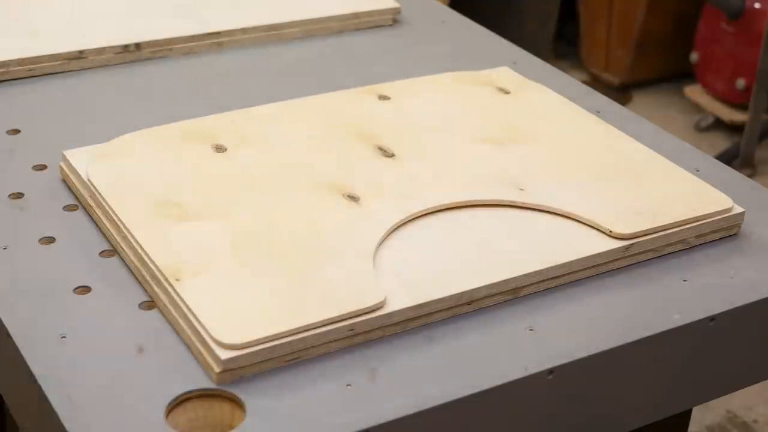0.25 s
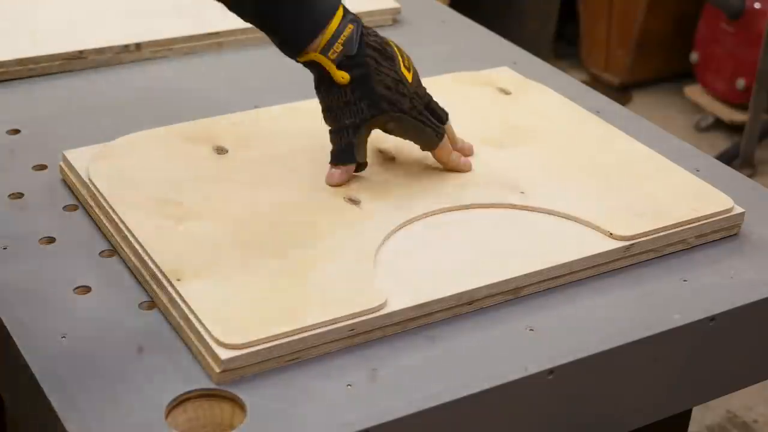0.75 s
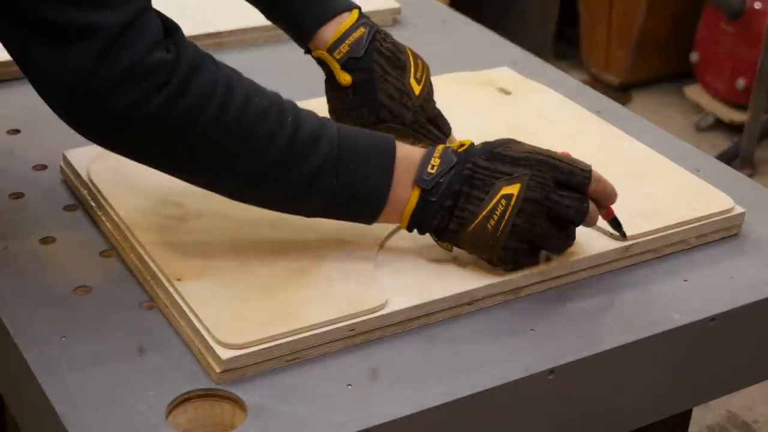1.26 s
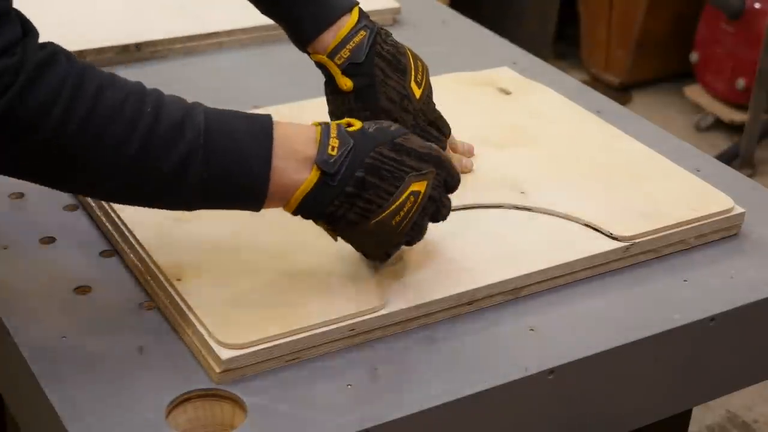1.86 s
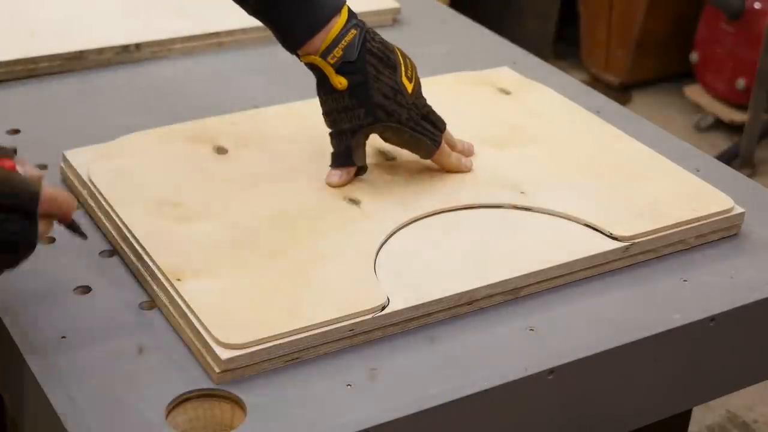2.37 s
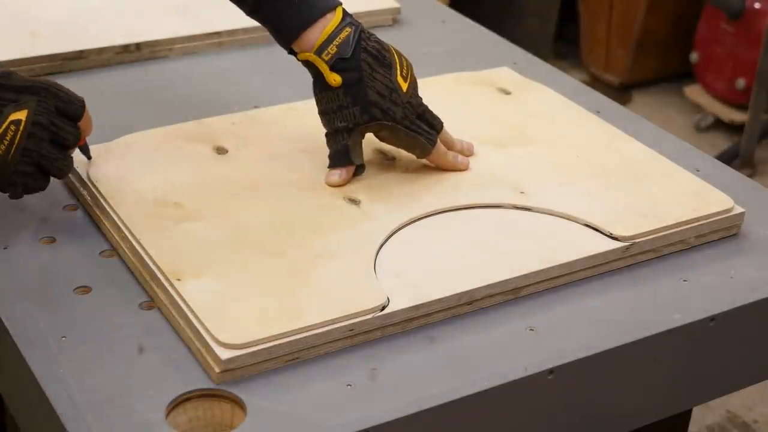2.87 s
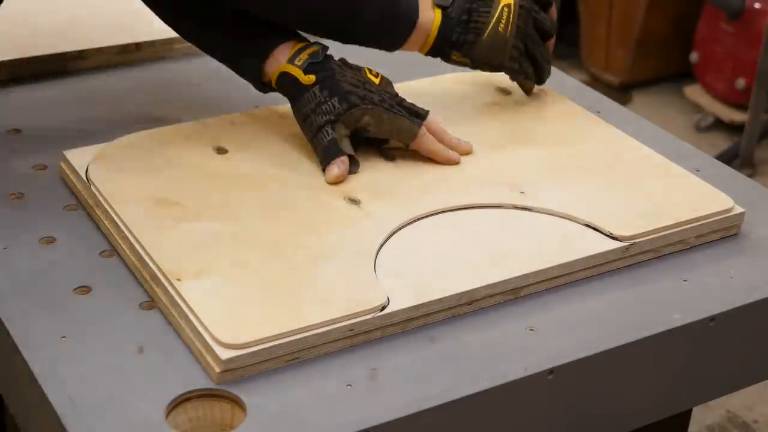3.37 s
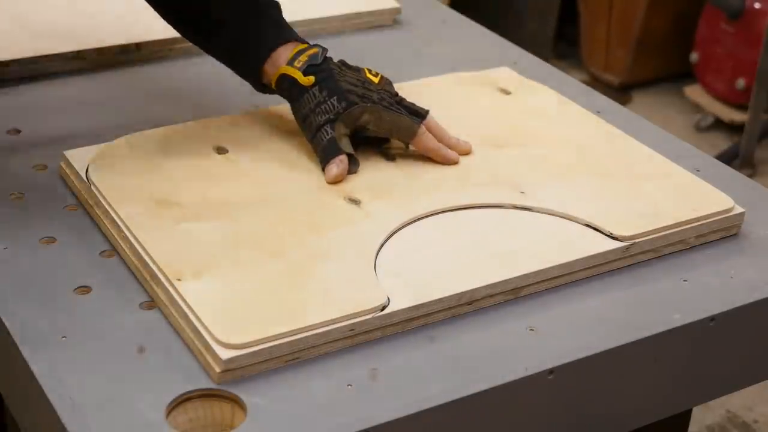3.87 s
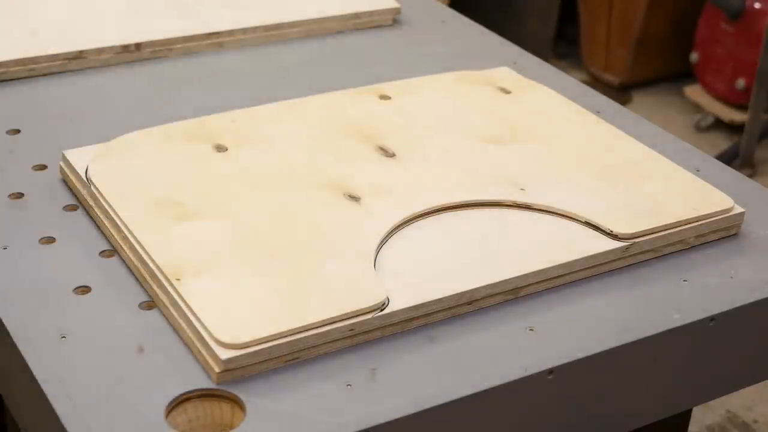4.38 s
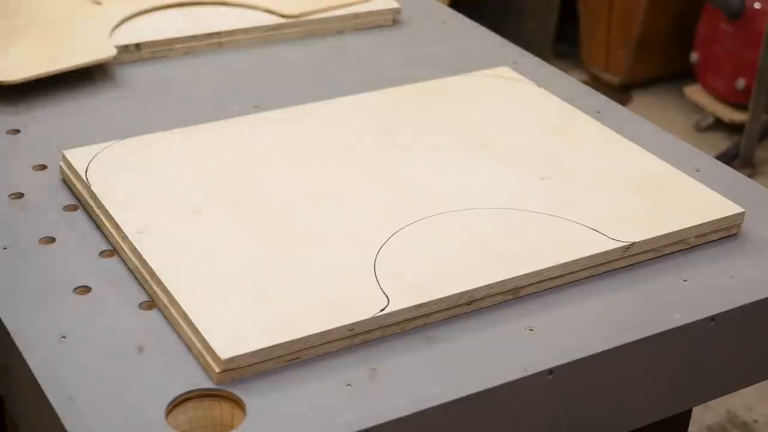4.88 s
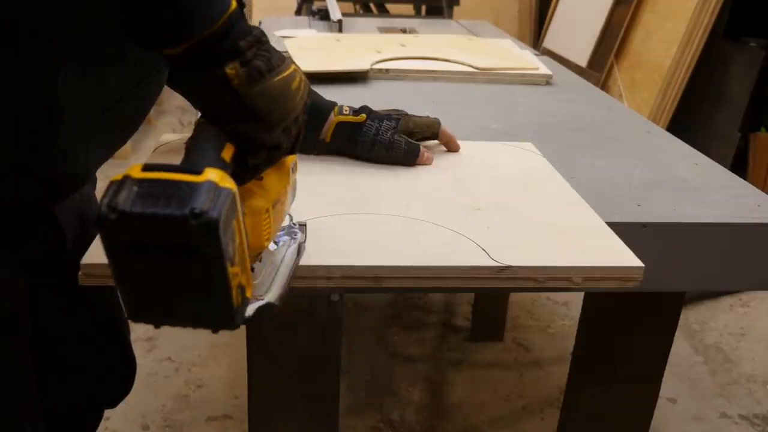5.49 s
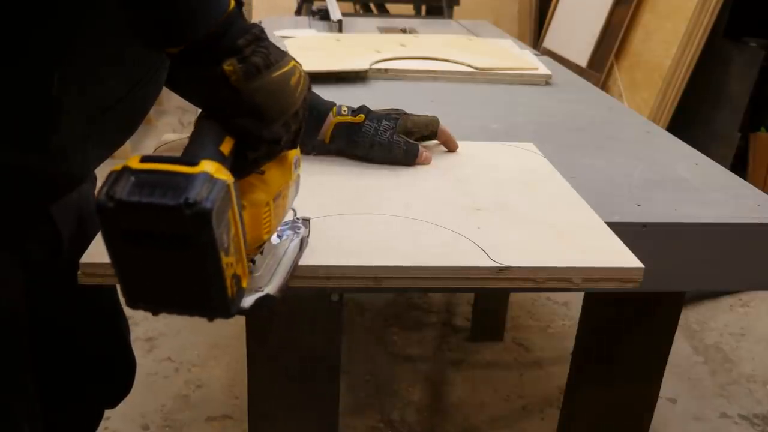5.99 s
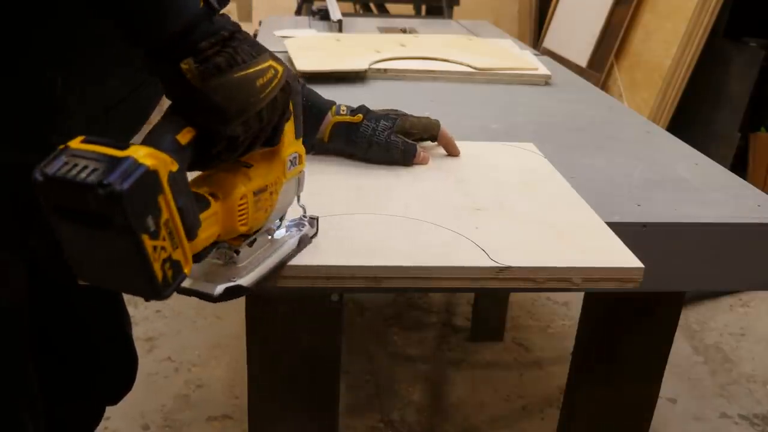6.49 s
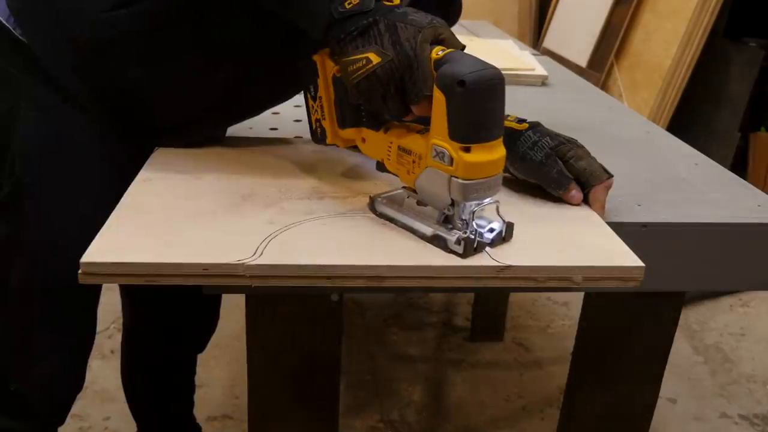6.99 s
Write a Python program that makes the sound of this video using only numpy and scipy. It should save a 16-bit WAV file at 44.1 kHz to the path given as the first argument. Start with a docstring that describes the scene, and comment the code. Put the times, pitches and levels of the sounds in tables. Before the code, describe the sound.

Soft scuffs, wooden knocks and pencil scrapes in a quiet workshop, followed by a double clack and a loud jigsaw cutting.

```python
"""Gloved hands slide a plywood template over a board, with scuffs, knocks and brief squeaks. A pencil taps and
traces round it; the template is lifted and lands aside, ringing, on two corners. Then a jigsaw cuts the
overhanging board: each blade stroke drives the wood into a buzz, the teeth tear and the gears whine; the scene
changes to a later stretch of sawing. Faint workshop air lies underneath. The bass sits in the centre and the
treble spreads wide."""
import sys
import numpy as np
from scipy import signal
from scipy.fft import rfft, irfft, next_fast_len
from scipy.io import wavfile
from scipy.ndimage import uniform_filter1d, map_coordinates

SR = 44100
rng = np.random.default_rng(int(sys.argv[2]) if len(sys.argv) > 2 else 0)


def master(y):
    """Save y as 16-bit WAV."""
    cut = np.clip(np.atleast_2d(y).T, -1, 1)
    pcm = np.round(cut * 32767)  # scale
    wavfile.write(sys.argv[1], SR, pcm.astype(np.int16))


N = 319724
TIME = np.arange(N) / SR
SAW_ON_S, SECOND_CUT_S = 5.163, 6.776


def amp(db):
    """dB to gain."""
    return 10 ** (np.asarray(db) / 20)


def unit(x):
    """Scale to rms 1."""
    return x / np.sqrt(np.mean(x ** 2) + 1e-20)


def gain_at(points, hz):
    """Gain from (Hz, dB) points on a log frequency axis."""
    point_hz, db = np.transpose(points)
    return amp(np.interp(np.log(hz + 1), np.log(point_hz + 1), db))


def curves(rows):
    """One value per sample for each column after the time."""
    times, *columns = np.transpose(rows)
    return [np.interp(TIME, times, column) for column in columns]


def wobble(knots_per_s):
    """Smooth random curve, rms near 1."""
    return map_coordinates(rng.standard_normal(2048), [TIME * knots_per_s], mode="mirror")


def random_phases():
    """One phase each for mid and side."""
    return rng.uniform(0, 2 * np.pi, (2, 1))


def swell_db(peak_s, swell_s, fade_s, power=2):
    """Hump, 15 dB down at swell_s before and fade_s after its peak."""
    return -15 * ((TIME - peak_s) / np.where(TIME < peak_s, swell_s, fade_s)) ** power


def resonance(hz, centre_hz, width_hz):
    """Causal band-pass response."""
    return 1j * hz * width_hz / (centre_hz ** 2 - hz ** 2 + 1j * hz * width_hz)


def modal_response(hz, modes):
    """Sum of (Hz, width Hz, dB) resonances, alternating in sign."""
    return sum((-1) ** k * amp(db) * resonance(hz, centre_hz, width_hz)
               for k, (centre_hz, width_hz, db) in enumerate(modes))


def filtered(x, response):
    """Apply a complex frequency response."""
    size = next_fast_len(N + 8192)
    return irfft(rfft(x, size) * response(np.fft.rfftfreq(size, 1 / SR)), size)[..., :N]


def noise(spectrum, patchy_db, frame=256):
    """Two unrelated noises (mid, side) with shared patches of random gain."""
    bins = signal.stft(rng.standard_normal((2, N)), nperseg=frame)[2]
    patches = uniform_filter1d(rng.standard_normal(bins.shape[1:]), size=3, axis=0)
    patches = uniform_filter1d(patches, size=8, axis=1)
    pair = signal.istft(bins * amp(patchy_db * unit(patches)), nperseg=frame)[1][:, :N]
    return unit(filtered(pair, lambda hz: gain_at(spectrum, hz)))


# Stereo width of near sources: (frequency [Hz], side minus mid [dB])
NEAR_WIDTH = [(90, -55), (200, -29), (400, -60), (700, -81), (1290, -103), (2380, -15.5), (4400, -3),
              (15000, -3.5)]


def to_stereo(pair, width=NEAR_WIDTH):
    """Left and right from mid and filtered side."""
    side = filtered(pair[1], lambda hz: gain_at(width, hz))
    return np.array([pair[0] + side, pair[0] - side])


# Microphone self-noise: (frequency [Hz], density [dB])
RUMBLE_SPECTRUM = [(15, -12), (60, 8), (200, 8), (400, -25)]


def rumble():
    """Low, steady self-noise of the microphone."""
    return to_stereo(amp(-86) * noise(RUMBLE_SPECTRUM, patchy_db=0.6), width=[(60, -13)])


# Workshop air: (frequency [Hz], density [dB])
AIR_SPECTRUM = [(80, -55), (160, -10.5), (300, -7.5), (620, -5), (1120, -7), (3120, -25), (15100, -38.5),
                (16500, -46)]
# Its stereo width: (frequency [Hz], side minus mid [dB])
AIR_WIDTH = [(100, 1), (250, -15.5), (700, -17), (1300, -10.5), (2400, 4.5), (4400, 13), (15000, 5)]


def workshop_air():
    """Room noise; drops away when the saw starts."""
    level_db = -65 - 16 * (TIME > SAW_ON_S) + 0.83 * wobble(7.9)
    return to_stereo(amp(level_db) * noise(AIR_SPECTRUM, patchy_db=1.5), AIR_WIDTH)


# Faint tones: (start [s], length [s], start pitch, capped at top_hz [Hz], level [dB])
FAINT_TONES = [(.54, .27, 614, -63.5), (.92, .33, 742, -63)]


def faint_tones():
    """Soft, rough tones that sag in pitch; the first rises beforehand."""
    top_hz, rise_hz_per_s, sag_hz_per_s = 737, 2200, 900
    ramp_s, fade_db_per_s = 0.018, 27
    out = np.zeros(N)
    for start_s, length_s, start_hz, db in FAINT_TONES:
        t = TIME - start_s
        top_s = max(top_hz - start_hz, 0) / rise_hz_per_s
        hz = top_hz - np.where(t < top_s, rise_hz_per_s * (top_s - t), sag_hz_per_s * (t - top_s))
        envelope = np.clip(np.minimum(t, length_s - t) / ramp_s, 0, 1) * amp(db - fade_db_per_s * abs(t))
        out += np.sqrt(2) * envelope * np.sin(2 * np.pi * np.cumsum(hz) / SR + 1.4 * wobble(90))
    return out * amp(3 * wobble(20))


# Glove, pencil and sheet strokes: (peak [s], swell [s], fade [s], body [dB], hiss [dB])
RUBS = [(.04, 0.17, 0.1, -51, -43.5), (.25, 0.1, 0.079, -61, -42), (.3, 0.028, 0.043, -50.5, -66),
        (.5, 0.31, 1, -70, -73), (.57, 0.054, 0.038, -53.5, -60), (.74, 0.025, 0.028, -53.5, -49.5),
        (.89, 0.12, 0.11, -65.5, -66.5), (1.1, 0.063, 0.18, -66.5, -67), (1.7, 0.22, 0.34, -65.5, -73),
        (1.95, 0.21, 0.12, -61.5, -61), (2.5, 0.1, 0.18, -67.5, -81), (2.95, 0.17, 0.31, -62.5, -74),
        (3.3, 0.11, 0.21, -63, -71.5), (3.72, 0.066, 0.29, -59, -70), (4.1, 0.14, 0.3, -63, -70),
        (4.45, 0.17, 0.37, -63, -62.5), (4.65, 0.043, 0.099, -50.5, -48), (4.682, 0.027, 0.025, -67, -36.5),
        (5.0, 0.34, 0.39, -61.5, -67.5)]
# Rubbed board: (frequency [Hz], density [dB])
BODY_SPECTRUM = [(300, -33), (450, -7), (630, -12), (935, -4.5), (1400, -4), (2200, -6), (3500, -10),
                 (8000, -19), (12000, -49)]
# Surface hiss: (frequency [Hz], density [dB])
HISS_SPECTRUM = [(880, -29), (1500, -9.5), (3030, -5.5), (15100, -4), (16000, -16), (16500, -41)]


def rubbing():
    """Grit of the wood grain: a dull part through the board, a hiss off the surface."""
    body_power, hiss_power = amp(-72.5) ** 2, amp(-83.5) ** 2  # steady sleeve and glove rustle
    for peak_s, swell_s, fade_s, body_db, hiss_db in RUBS:
        contact_db = swell_db(peak_s, swell_s, fade_s)
        body_power += amp(body_db + contact_db) ** 2
        hiss_power += amp(hiss_db + contact_db) ** 2
    grit = amp(0.8 * wobble(60)) * (TIME < SAW_ON_S)
    body = np.sqrt(body_power) * noise(BODY_SPECTRUM, patchy_db=2.8, frame=1024)
    hiss = np.sqrt(hiss_power) * noise(HISS_SPECTRUM, patchy_db=2.4, frame=512)
    return to_stereo(grit * (body + hiss))


# Stick-slip: (peak [s], swell [s], fade [s], slip rate [Hz], spectral peak [harmonic no.], level [dB])
STICK_SLIPS = [(.19, 0.077, .045, 3340, 1, -55), (0.952, 0.012, 0.027, 2426, 1.8, -47),
               (4.684, 0.018, 0.012, 2800, 2.9, -36)]


def squeaks():
    """A sliding surface sticks and slips unevenly: a short rasping note."""
    fall_db_per_harmonic, blur_rad = 7, 0.45
    out = np.zeros((2, N))
    for peak_s, swell_s, fade_s, hz, loudest, db in STICK_SLIPS:
        phase = 2 * np.pi * hz * TIME + blur_rad * wobble(250)
        envelope_db = db + swell_db(peak_s, swell_s, fade_s)
        for k in range(1, 6):
            level_db = envelope_db - fall_db_per_harmonic * abs(k - loudest) + 4 * wobble(150)
            out += amp(level_db) * np.sin(k * phase + random_phases())
    return to_stereo(out)


# Hard drags along the edge: (peak [s], swell [s], fade [s], level [dB], upper mode trim [dB])
PENCIL_DRAGS = [(2.97, .2, .19, -62, -1), (3.28, .035, .035, -62, -14)]
# Board modes under the lead: (centre [Hz], width [Hz], gain [dB])
PENCIL_MODES = [(925, 35, 0), (2170, 140, -15), (3110, 120, -11), (4630, 200, -19)]


def pencil_drags():
    """Tiny uneven slips of the lead sound a few modes of the board."""
    slips_per_s = 2000
    out = np.zeros((2, N))
    for peak_s, swell_s, fade_s, db, upper_db in PENCIL_DRAGS:
        slips = (rng.random((2, N)) < slips_per_s / SR) * rng.standard_normal((2, N))
        modes = np.array(PENCIL_MODES, float)
        modes[1:, 2] += upper_db
        scrape = unit(filtered(slips, lambda hz: modal_response(hz, modes)))
        out += amp(db + swell_db(peak_s, swell_s, fade_s, power=4)) * scrape
    return to_stereo(out * amp(wobble(29.7)))


# Pencil tip set down: (time [s], level [dB], note [Hz])
PENCIL_TAPS = [(2.303, -59.5, 2160), (2.4338, -50, 1660), (2.753, -55.5, 1610)]


def pencil_taps():
    """The tip meets wood: a dry click with a short hollow note."""
    note_t60_s, click_t60_s = 0.035, 0.045
    notes, clicks = np.zeros((2, N))
    for start_s, db, note_hz in PENCIL_TAPS:
        t = np.clip(TIME - start_s, 0, None)
        notes += amp(db - 60 * t / note_t60_s) * np.sin(2 * np.pi * note_hz * t)
        clicks += (t > 0) * amp(db + 9 - 60 * t / click_t60_s) * rng.standard_normal(N)
    return notes + filtered(clicks, lambda hz: resonance(hz, 1540, 1700) ** 2)


# Knocks, ticks and scuffs:
# (time [s], ring [dB], crack [dB], ring centre [Hz], crack centre [Hz], sharpness [dB], rattle t60 [s])
CONTACTS = [(0.105, -49, -38, 1880, 8200, 12, 0.034), (0.2251, -38, -48, 2500, 11100, 14, 0.046),
            (.3, -46.5, -43, 910, 9800, 12, 0.12), (0.45, -66, -57, 1940, 4030, 10, 0.16),
            (0.5331, -47.5, -66, 1360, 4000, 23.5, 0.041), (0.6934, -49, -63, 830, 3830, 17.5, 0.14),
            (0.73, -59, -47.5, 2460, 4200, 1, 0.13), (.801, -40.5, -46.5, 2190, 3710, 2, 0.21),
            (0.8068, -36, -58, 1000, 4020, 17.5, 0.094), (.829, -34.5, -39.5, 1100, 3580, 8.5, 0.047),
            (.866, -52, -58, 2100, 4000, 8, 0.061), (0.924, -43.5, -60, 2130, 3910, 7, 0.11),
            (.942, -40, -36, 2060, 4860, 0, 0.11), (1.011, -46.5, -57, 940, 4430, -8, 0.082),
            (1.128, -71, -47, 3250, 6650, 15, 0.095), (1.264, -76, -63.5, 619, 6850, 21, 0.18),
            (3.513, -52, -72, 1500, 3500, 16, .07), (3.871, -45.5, -60, 2120, 4970, -6, 0.082),
            (3.944, -50.5, -48, 870, 3700, 13.5, 0.074), (4.1047, -41.5, -41, 1280, 3720, 6, 0.07),
            (4.13, -54, -48, 1170, 3640, 8, 0.1), (4.2073, -39.5, -38, 2340, 4030, 5.5, 0.083),
            (4.3045, -67, -49, 633, 5800, 18, 0.068), (4.333, -56, -48, 1340, 6900, 4, 0.056),
            (4.381, -75, -34, 3380, 6900, 23, 0.089), (4.465, -43, -46.5, 1170, 3500, 3, 0.096),
            (4.486, -44.5, -55, 2930, 3520, 9, 0.045), (4.561, -52.5, -60, 1660, 3500, 18.5, 0.066),
            (4.574, -40.5, -43, 2170, 3930, 7, 0.088), (4.848, -45, -62, 2900, 3500, 3, 0.036),
            (4.986, -41, -45, 2050, 3480, 12, 0.086), (4.856, -28.5, -22.5, 1440, 7560, 14, 0.11),
            (4.9087, -18.5, -17, 1460, 5100, 8, 0.094)]
# Plywood modes: (centre [Hz], width [Hz], gain [dB])
BOARD_MODES = [(510, 34, -5), (599.5, 19, -1.5), (724, 29, -5), (927, 74, -2.5), (1173, 38, -5.5),
               (1445, 117, -4), (1800, 320, -13), (2230, 150, -4), (2945, 48, -6)]
# Airborne crack: (frequency [Hz], density [dB])
CRACK_SPECTRUM = [(300, -47), (1180, -2), (2000, -5), (3190, -0.5), (5420, -4.5), (14800, -5.5),
                  (16500, 1.5)]


def knocks():
    """One sharp touch and a rattle of small impacts ring the board and crack in the air."""
    size, lead = 8192, 1024  # samples
    t, hz = np.arange(size - lead) / SR, np.fft.rfftfreq(size, 1 / SR)
    mid_side_gain = np.array([np.ones_like(hz), gain_at(NEAR_WIDTH, hz)])
    out = np.zeros((2, N))
    for start_s, ring_db, crack_db, ring_hz, crack_hz, sharp_db, t60_s in CONTACTS:
        attack_s = 0.0029 * amp(-sharp_db / 2)
        rattle = amp(-60 * t / t60_s) * (1 - np.exp(-t / attack_s))
        touch_tail = 0.1 * amp(sharp_db - 60 * t / 0.015)
        force = np.zeros((2, 2, size))  # (board, air) x (mid, side)
        force[..., lead:] = rng.standard_normal((2, 2, len(t))) * (rattle + touch_tail)
        force[..., lead] = amp(sharp_db) * np.array([[2.0, 1.7], [0.85, 1.7]])
        # the spot struck sets which modes answer
        modes = [(centre, width, db + rng.normal(0, 1)) for centre, width, db in BOARD_MODES]
        wood = modal_response(hz, modes) + 0.1 + 0.36 * resonance(hz, ring_hz, 58)
        wood *= (0.17 + resonance(hz, ring_hz, ring_hz)) * resonance(hz, 620, 2900)
        crack_peak = 17 * resonance(hz, crack_hz, 0.7 * crack_hz) + 6 * resonance(hz, crack_hz, 350)
        air = gain_at(CRACK_SPECTRUM, hz) * (1 + crack_peak)
        for drive, response, db, pan_db in (force[0], wood, ring_db, 0), (force[1], air, crack_db, 2.2):
            response_rms = np.sqrt(np.mean(abs(response) ** 2))
            mid, side = irfft(rfft(drive) * response * mid_side_gain, size) / response_rms
            stereo = [amp(db + pan_db / 2) * (mid + side), amp(db - pan_db / 2) * (mid - side)]
            out[:, round(start_s * SR) - lead:][:, :size] += stereo
    return out


# Template corners landing: (time [s], level [dB])
LANDINGS = [(4.856, -23), (4.9087, -18)]
# Free template modes: (frequency [Hz], gain at corner 1 [dB], gain at corner 2 [dB], t60 [s])
TEMPLATE_MODES = [(611.5, -3, -4.5, 0.066), (973, -8.5, -8, 0.14), (1396, -14, 1, .085),
                  (1467, 3, -1, 0.099), (1910, -13, -6, .085), (2370, 1, -16, 0.034),
                  (2860, -8.5, -4, 0.084), (3270, -22, -5, 0.1)]


def template_drop():
    """Each landing rings the modes of the loose sheet anew."""
    attack_s = 0.0013
    out = np.zeros((2, N))
    for corner, (start_s, db) in enumerate(LANDINGS):
        t = np.clip(TIME - start_s, 0, None)
        attack = 1 - np.exp(-t / attack_s)
        for hz, *corner_db, t60_s in TEMPLATE_MODES:
            decay = amp(db + corner_db[corner] + wobble(120) - 60 * t / t60_s)
            out += attack * decay * np.sin(2 * np.pi * hz * t + random_phases())
    return to_stereo(out)


def blade_buzz(levels_db, base_db, stroke_rad, given_gains, drift_db, drift_rad):
    out = np.zeros((2, N))
    for k, db in enumerate(levels_db, start=2):
        if db is None:
            gain = given_gains[k]
        else:
            gain = amp(base_db + db + drift_db * k ** 0.27 * (1.3 * wobble(11) + 0.6 * wobble(40)))
        phase = k * stroke_rad + drift_rad * k ** 1.136 * wobble(22) + random_phases()
        out += np.sqrt(2) * gain * np.sin(phase)
    return out


def gear_whine(tones):
    """Blurred, wavering gear tones."""
    return sum(amp(db + 2.5 * wobble(9))
               * np.sin(2 * np.pi * hz * TIME + 1.4 * wobble(80) + random_phases()) for hz, db in tones)


# First scene of sawing, stroke harmonics from 2 up: (level re base [dB])
EDGE_HARMONICS = [-25.5, None, -14.5, -21, None, -20.5, -21.5, -16.5, -13.5, -18.5, -13.5, None, -24.5, -19,
                  -18, None, -31, -27.5, -18, -19, -42, -36, -21.5, -28, -40]
# Shaking overhang: (time [s], harmonic 3 [dB], harmonic 6 [dB])
EDGE_SHAKE = [(5.23, -34, -55), (5.298, -30.5, -40.5), (5.37, -45.5, -47), (5.425, -28.5, -40.5),
              (5.46, -37.5, -44.5), (5.612, -33, -38), (5.698, -38, -44), (5.778, -35, -48),
              (5.886, -32.5, -39.5), (5.97, -35.5, -49.5), (6.075, -34, -42.5), (6.132, -30, -47),
              (6.166, -36.5, -47), (6.24, -35.5, -42), (6.376, -35, -44.5), (6.47, -40.5, -49),
              (6.568, -33.5, -48), (6.746, -35.5, -55), (6.76, -36.5, -69)]
# Whine of the cut: (time [s], harmonic 13 [dB], harmonic 17 [dB])
EDGE_WHINE = [(5.18, -45, -59), (5.26, -50, -47), (5.48, -53, -49), (5.58, -45.5, -43), (5.65, -40.5, -51),
              (5.74, -52, -48), (5.86, -45, -44.5), (6.02, -48.5, -49), (6.26, -50, -46),
              (6.42, -45.5, -56), (6.53, -47, -46.5), (6.62, -50, -59)]
# Teeth tearing wood: (frequency [Hz], density [dB])
EDGE_TEETH = [(120, -86), (200, -50.5), (542, -21), (628, -2), (728, -28), (829, -18), (961, -27.5),
              (1240, -5.5), (1400, -21.5), (1700, -20.5), (2250, -14.5), (2600, -11.5), (2900, -16),
              (3300, -13.5), (3800, -16.5), (4400, -17.5), (4900, -17.5), (15600, -23.5), (16500, -60)]
# Gear tones: (frequency [Hz], level [dB])
EDGE_GEARS = [(11305, -62), (13501, -59)]


def early_sawing(stroke_rad):
    """The blade chatters as it runs up, the overhang shakes, and the nearly severed piece flaps."""
    chatter_s, chatter_hz, flap_hz, edge_hz = 0.065, 55.3, 29, 1212
    shake_db, sixth_db = curves(EDGE_SHAKE)
    thirteenth_db, seventeenth_db = curves(EDGE_WHINE)
    run_up = np.clip((SAW_ON_S + chatter_s - TIME) / 0.018, 0, 1)
    chatter_db = 8 * run_up * (np.sin(2 * np.pi * chatter_hz * (TIME - 5.17)) - 1)
    flap = np.clip((TIME - 6.58) / 0.041, 0, 1)
    flap_db = 2.07 * flap * np.sin(2 * np.pi * flap_hz * (TIME - 6.64))
    sixth_db += 1.4 * wobble(45)
    gains = {3: amp(shake_db + chatter_db + flap_db + 0.28 * wobble(46)), 6: amp(sixth_db),
             13: amp(thirteenth_db + wobble(40)), 17: amp(seventeenth_db + wobble(40))}
    swing_db = shake_db - np.mean(EDGE_SHAKE, axis=0)[1]
    bite = amp(-40 - 0.065 * swing_db - 2 * flap + 0.78 * wobble(20))  # louder when the edge lies still
    labouring_rad = stroke_rad + (0.03 + 0.15 * run_up) * wobble(30)
    base_db = -36.5 - 0.84 * run_up
    buzz = blade_buzz(EDGE_HARMONICS, base_db, labouring_rad, gains, drift_db=1.3, drift_rad=0.025)
    teeth = bite * noise(EDGE_TEETH, patchy_db=4, frame=2048)
    gears = gear_whine(EDGE_GEARS)
    # the loose edge rings just under harmonic 6 and beats with it
    ring = amp(sixth_db - 10 + 4 * wobble(12)) * np.sin(2 * np.pi * edge_hz * TIME + 2.5 * wobble(14))
    return buzz + teeth + gears + ring


# Second scene of sawing, stroke harmonics from 2 up: (level re base [dB])
LATER_HARMONICS = [-26.5, None, -2.2, -11, None, -6.5, -14, -10.5, -13, -14, -11, -4.5, -13.5, -27,
                   -6.5, -12, -36, -31, -13, -19, -15.5, -26, -22, -23, -7.5, -12]
# Teeth tearing wood: (frequency [Hz], density [dB])
LATER_TEETH = [(120, -83), (200, -47), (562, -21.5), (628, -14.5), (860, -18), (926, -25), (1240, -12),
               (1400, -19), (1580, -16), (2650, -12.5), (15000, -18.5), (16500, -19.5)]
# Gear tones: (frequency [Hz], level [dB])
LATER_GEARS = [(7149, -62), (11989, -52)]


def later_sawing(stroke_rad):
    """Steady sawing; the teeth tear a little harder on the upstroke."""
    base_db, gains = -43, {3: amp(-41), 6: amp(-47)}
    buzz = blade_buzz(LATER_HARMONICS, base_db, stroke_rad, gains, drift_db=0.46, drift_rad=0.048)
    teeth = noise(LATER_TEETH, patchy_db=3.5, frame=2048)
    bite = amp(-40.5 + 0.78 * wobble(20)) * (1 + 0.13 * np.sin(stroke_rad))
    return buzz + bite * teeth + gear_whine(LATER_GEARS)


# Blade speed under load: (time [s], stroke rate [Hz])
STROKE_RATE = [(5.163, 183.8), (5.19, 213.7), (5.22, 212.4), (5.28, 207.5), (5.34, 208), (5.37, 212.7),
               (5.42, 207.9), (5.46, 211.3), (5.62, 207.8), (5.71, 211.9), (5.84, 209.4), (5.875, 208.5),
               (5.94, 211.7), (6.08, 209.5), (6.12, 208), (6.165, 212), (6.32, 211.4), (6.36, 208.7),
               (6.48, 211.4), (6.56, 207.7), (6.64, 211.6), (6.76, 209.5), (7.25, 209.8)]


def jigsaw():
    """The blade drives the board once a stroke; the first scene of sawing fades out, then the second fades in."""
    attack_s, handover_s = 0.0018, 0.00497
    stroke_rad = 2 * np.pi * np.cumsum(curves(STROKE_RATE)[0]) / SR
    attack = np.clip((TIME - SAW_ON_S) / attack_s, 0, 1)
    handover = (TIME - SECOND_CUT_S) / handover_s
    first = attack * np.clip(-handover, 0, 1) * early_sawing(stroke_rad)
    second = np.clip(handover, 0, 1) * later_sawing(stroke_rad)
    return to_stereo(first + second)


def scene():
    """Background, handwork and saw, in stereo."""
    background = workshop_air() + rumble() + faint_tones()
    handwork = rubbing() + squeaks() + pencil_drags() + pencil_taps() + knocks() + template_drop()
    return background + handwork + jigsaw()


def record(dry):
    """Steep low-pass band limit."""
    top_hz, skirt_hz, stop_db = 15750, 600, -120
    return filtered(dry, lambda hz: amp(stop_db * np.clip((hz - top_hz) / skirt_hz, 0, 1)))


dry = scene()
out = record(dry)
master(out)
```